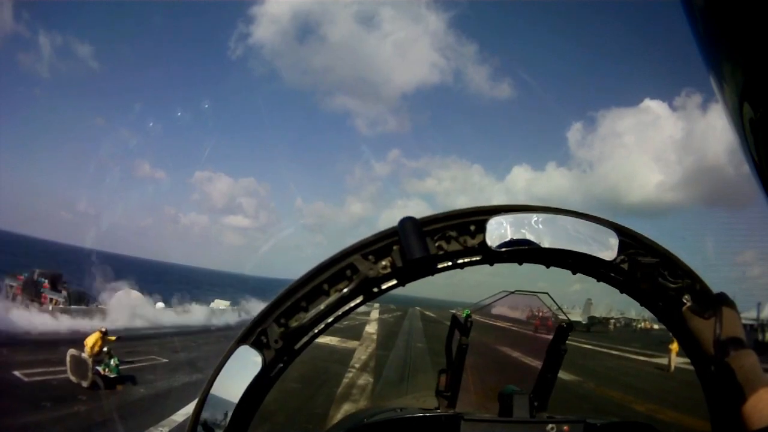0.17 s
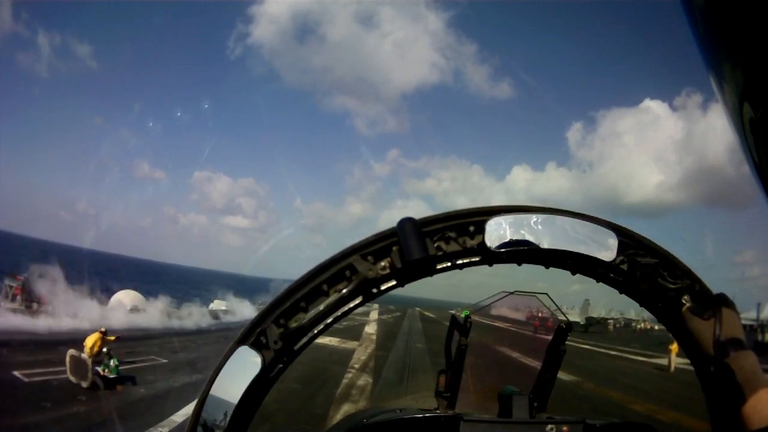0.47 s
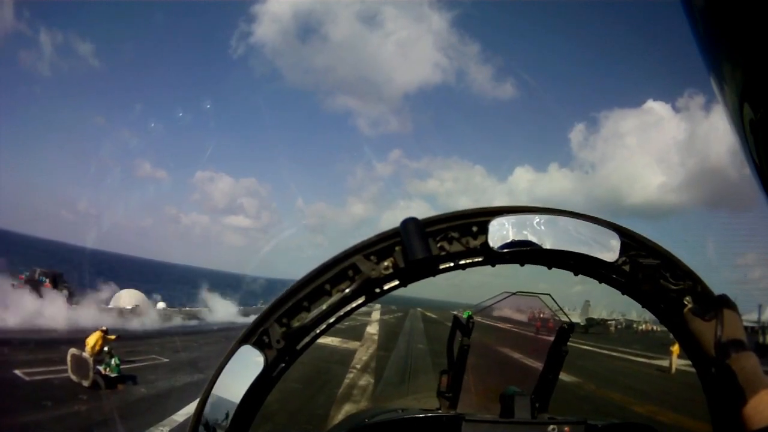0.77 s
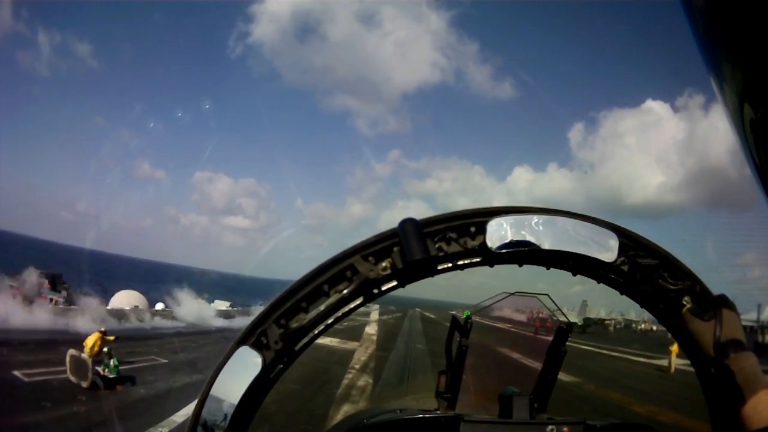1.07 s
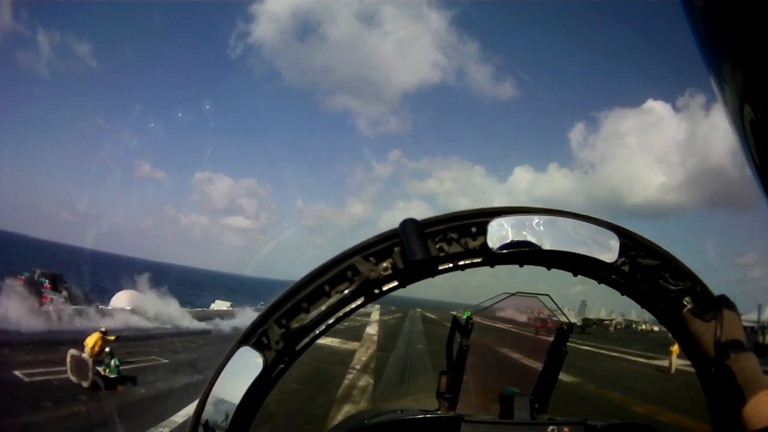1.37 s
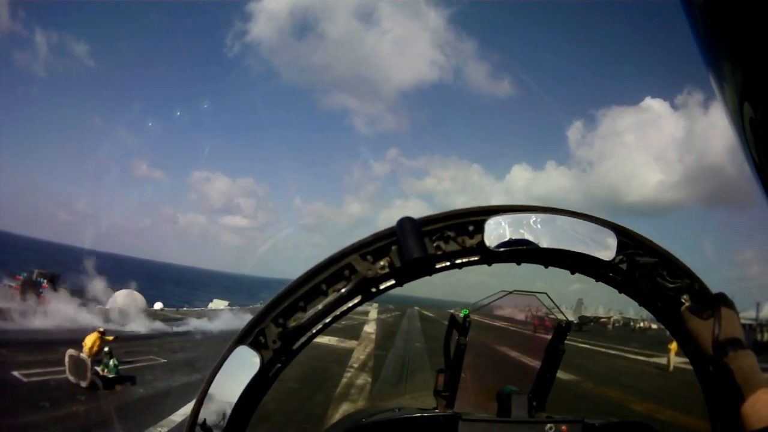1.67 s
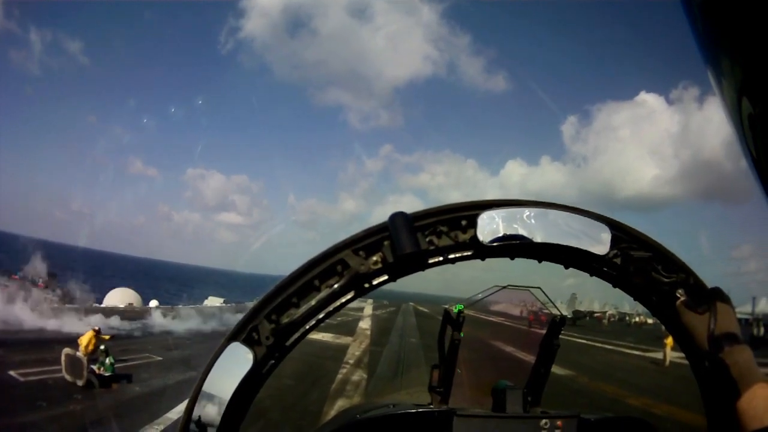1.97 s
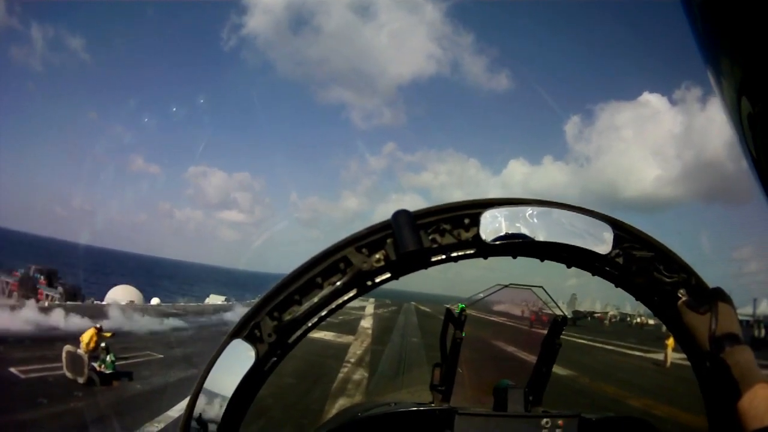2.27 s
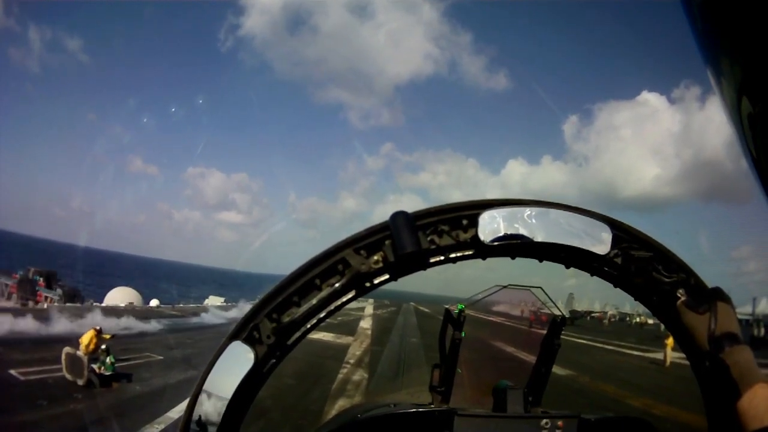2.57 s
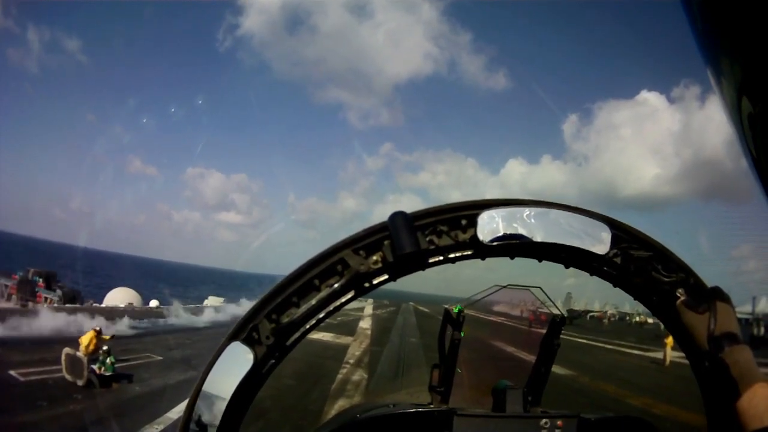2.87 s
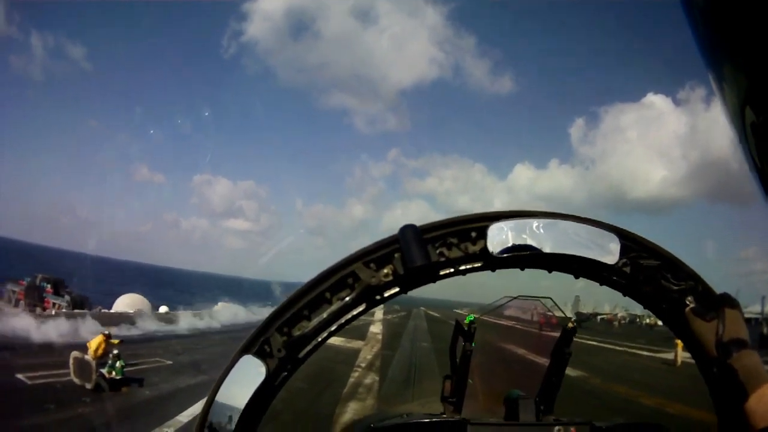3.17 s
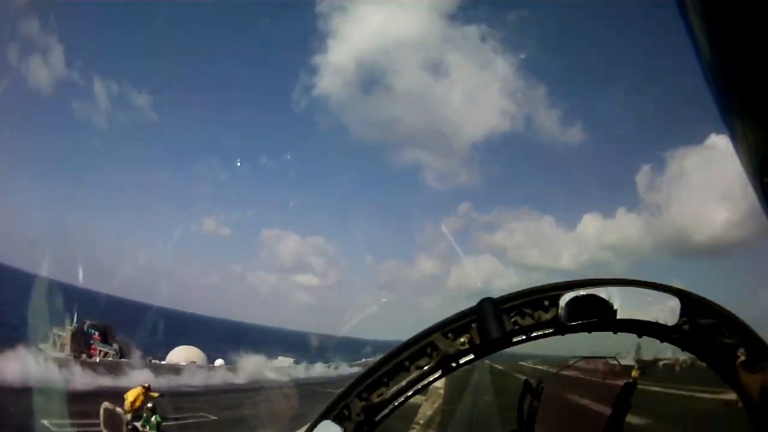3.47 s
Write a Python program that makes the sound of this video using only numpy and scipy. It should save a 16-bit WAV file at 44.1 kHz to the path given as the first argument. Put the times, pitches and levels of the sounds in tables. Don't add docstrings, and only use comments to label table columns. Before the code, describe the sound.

A steady, harsh jet roar with a thin high whine fills the cockpit; near the end a tug and violent thump briefly duck the sound, then it surges back with rumbling, distorted on a small camera microphone.

```python
import sys
import numpy as np
from scipy import signal
from scipy.io import wavfile
from scipy.ndimage import uniform_filter1d

SR = 44100
rng = np.random.default_rng(int(sys.argv[2]) if len(sys.argv) > 2 else 0)


def to_wav(sig):
    pcm = np.clip(np.atleast_2d(sig), -1, 1) * 32767
    pcm = np.round(pcm).astype(np.int16)
    wavfile.write(sys.argv[1], SR, pcm.T)


def gain_from_db(level_db):
    decades = np.asarray(level_db, float) / 20
    return 10 ** decades


N = 159642
TIME_S = np.arange(N) / SR
COUPLING_HZ = 700


def read(points, hz):
    f, value = np.transpose(points)
    return np.interp(np.log(hz + 1), np.log(f + 1), value)


def evened(x):
    return x / np.sqrt(np.mean(x ** 2) + 1e-20)


def slow(top_hz):
    width = max(int(SR / top_hz / 2), 1)
    once = uniform_filter1d(rng.standard_normal(N), width)
    return evened(uniform_filter1d(once, width))


def since_launch():
    return TIME_S - JOLTS[1][0]


# f/Hz, width/Hz, lift/dB
CABIN = [(249, 12.4, 6), (331.6, 25, 8.5), (395, 27, 3.5), (528, 28, 1), (2530, 180, 4), (2967, 17, 9),
         (3470, 210, 3.5), (4307, 203, 17.5), (4300, 92, -16), (5810, 56, -17.5), (7020, 440, 5.5),
         (7250, 66, -33.5)]


def noise(points, patchy_db):
    frames, hz = N // 512 + 10, np.fft.rfftfreq(2048, 1 / SR)
    real, imaginary, patches = rng.standard_normal((frames, 1025, 3)).T
    patches = uniform_filter1d(patches, size=20, axis=0)
    patches = evened(uniform_filter1d(patches, size=5, axis=1))
    modes_db = sum(db / (1 + (2 * (hz - f) / width) ** 2) for f, width, db in CABIN)
    made_up = np.sqrt(1 + (COUPLING_HZ / (hz + 20)) ** 2) * (hz > 20)
    gain = gain_from_db(read(points, hz) + modes_db) * made_up
    z = (real + 1j * imaginary) * gain[:, None] * gain_from_db(patchy_db * patches)
    return evened(signal.istft(z, nperseg=2048, noverlap=1536)[1][2048:2048 + N])


# f/Hz, level/dB per Hz
ROAR_SPECTRUM = [(15, -66), (25, -41), (65, -26.5), (130, -15.5), (300, -11), (520, -2.5), (900, -15),
                 (1500, -35.5)]


def roar():
    return gain_from_db(-8 + 0.95 * slow(top_hz=30.8)) * noise(ROAR_SPECTRUM, patchy_db=0.37)


# f/Hz, level/dB per Hz
HISS_SPECTRUM = [(880, -38), (1500, -14), (2780, -8), (3540, -2), (4720, -12), (6940, -13), (7420, -14),
                 (10900, -32), (15000, -81)]


def hiss(shade):
    gusts_db = 1.4 * slow(top_hz=24.0)
    return gain_from_db(-18.5 - 3.5 * shade + gusts_db) * noise(HISS_SPECTRUM, patchy_db=0.94)


WHINE_LEVELS = [-22.5, -34, -73, -76]


def whine(shade):
    blade_hz, wander_hz, waver_db = 3519.7, 1.5, 0.7
    turns = np.cumsum(blade_hz + wander_hz * slow(top_hz=2.9)) / SR
    tone = np.zeros(N)
    for harmonic, db in enumerate(WHINE_LEVELS, 1):
        level = np.sqrt(2) * gain_from_db(db + waver_db * slow(top_hz=21.0))
        tone += level * np.cos(2 * np.pi * harmonic * turns)
    return gain_from_db(-6 * shade) * tone


def drum():
    turns = np.cumsum(97.7 + 5.27 * slow(top_hz=8.7)) / SR
    return gain_from_db(-19 + 3.9 * slow(top_hz=6.9)) * np.sin(2 * np.pi * turns)


# t/s, level/dB
CRACKS = [(0.0189, -8.5), (0.0463, -21), (0.3607, -21), (0.38, -11), (0.5465, -22), (0.856, -21),
          (0.8722, -12.5), (0.9847, -15), (1.047, -14), (1.1614, -13), (1.26, -18), (1.4287, -19),
          (1.451, -28), (1.497, -15), (1.5662, -15), (1.6759, -10), (1.942, -31), (1.9894, -10),
          (2.0566, -13), (2.142, -21), (2.176, -17), (2.2662, -25), (2.6808, -15), (2.744, -25),
          (2.836, -15), (3.0694, -21)]


def crackle():
    rate_per_s, small_db, strong_lift_db = 110, -21.5, 3.5
    front_hz, front_s = 1100, 0.00027
    chance, sign, strength = rng.random((N, 3)).T
    size = (chance < rate_per_s / SR) * gain_from_db(small_db - 3.65 * np.log(strength + 0.045))
    for s, db in CRACKS:
        size[round(s * SR)] = gain_from_db(db + strong_lift_db)
    t = np.arange(-100, 100) / SR
    front = 2 * np.exp(-(t / front_s) ** 2 / 2) * np.sin(2 * np.pi * front_hz * t)
    return signal.oaconvolve(size * np.sign(sign - 0.5), front, "same")


# f/Hz, level/dB per Hz
ROLL_SPECTRUM = [(25, -17), (60, -5.5), (100, -2), (200, -1.5), (350, -13.5), (1000, -22.5), (3000, -22),
                 (4800, -39.5)]


def rolling():
    start_s, rise_s, shake_db, shake_die_s = 2.86, 0.06, 21, 0.14
    since = since_launch()
    build = np.clip((TIME_S - start_s) / rise_s, 0, 1)
    extra_db = shake_db * (since > 0) * np.exp(-abs(since) / shake_die_s)
    return build * gain_from_db(-13 + extra_db) * noise(ROLL_SPECTRUM, patchy_db=2.5)


# t/s, level/dB, gain duck/dB
JOLTS = [
    (2.903, 8, -1.5),
    (3.158, 36.5, -15),
    (3.496, -6, -1),
]


def jolts():
    swing_hz, sag, die_s = 112, 0.2, 0.0042
    out = np.zeros(N)
    for s, db, _ in JOLTS:
        u = np.maximum(TIME_S - s, 0)
        cycles = swing_hz * u
        phase = 2 * np.pi * cycles * (1 - sag * cycles / (1 + cycles))
        out += gain_from_db(db) * np.exp(-u / die_s) * np.sin(phase)
    return out


def scene():
    hold_s, back_s = 0.068, 0.075
    since = since_launch()
    shade = (since > 0) * np.exp(-np.maximum(since - hold_s, 0) / back_s)
    engine = roar() + hiss(shade) + whine(shade) + drum() + crackle()
    return (engine + rolling() + jolts())[None]


def duck_db():
    fall_s, hold_s, back_s = 0.009, 0.026, 0.1
    total_db = np.zeros(N)
    for s, _, db in JOLTS:
        u = np.maximum(TIME_S - s, 0)
        recovery = np.exp(-np.maximum(u - hold_s, 0) / back_s)
        total_db += db * (1 - np.exp(-u / fall_s)) * recovery
    return total_db


def limiter_db(x):
    threshold_db, share, back_db_per_s, fall_s = -6, 0.5, 118, 0.0016
    peak_db = 20 * np.log10(np.clip(abs(x[0]), 1e-6, 1))
    back_db = back_db_per_s * TIME_S
    held_db = np.maximum.accumulate(peak_db + back_db) - back_db
    over_db = np.maximum(held_db - threshold_db, 0)
    mean_db = over_db.mean()
    lag = np.exp(-1 / (fall_s * SR))
    smooth_db = signal.lfilter([1 - lag], [1, -lag], over_db - mean_db) + mean_db
    return -share * smooth_db


def coupled(x):
    pole = np.exp(-2 * np.pi * COUPLING_HZ / SR)
    return signal.lfilter([1, -1], [1, -pole], x - x[:, :1]) * (1 + pole) / 2


# f/Hz, level/dB
MIC = [(8000, -0.5), (11000, 1.5), (13000, -3.5), (15000, -6)]
# f/Hz, level/dB
GATE = [(5000, -12), (7600, -11), (8300, -4), (10000, -1.2), (12000, .6), (15000, 1.2)]


def thinned(x):
    shift, window = 2048 - 488, ("kaiser", 6)
    padded = np.pad(x, ((0, 0), (shift, 0)))
    hz, _, z = signal.stft(padded, SR, window, nperseg=2048, noverlap=1024)
    power = uniform_filter1d(abs(z) ** 2, size=5, axis=1)
    power = uniform_filter1d(power, size=2, axis=2)
    usual = uniform_filter1d(power, size=70, axis=1)
    strong = power > usual * gain_from_db(read(GATE, hz))[:, None] ** 2
    kept = strong | (hz < 4700)[:, None]
    gain = gain_from_db(read(MIC, hz)) * (hz < 15030)
    y = signal.istft(z * kept * gain[:, None], SR, window, nperseg=2048, noverlap=1024)[1]
    return y[:, shift:shift + N]


def band_limit(x):
    return signal.sosfilt(signal.butter(12, 15700, fs=SR, output="sos"), x)


def record(dry):
    drive_db, ceiling_db = 1.5, -1.5
    x = dry * gain_from_db(duck_db() + drive_db - ceiling_db)
    saturated = x / (1 + x ** 6) ** (1 / 6)
    clipped = gain_from_db(ceiling_db + limiter_db(x)) * saturated
    mix = thinned(coupled(clipped))
    return band_limit(mix)


dry = scene()
out = record(dry)
to_wav(out)
```